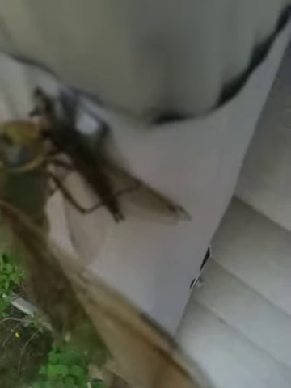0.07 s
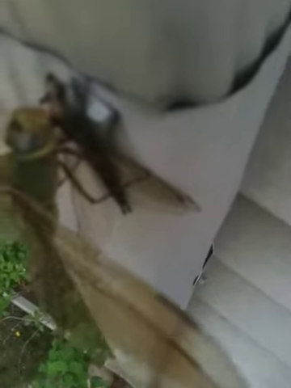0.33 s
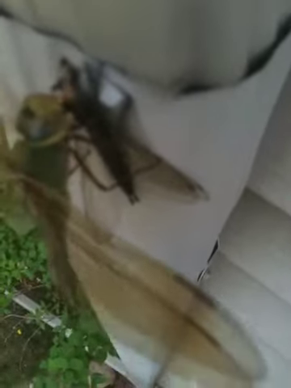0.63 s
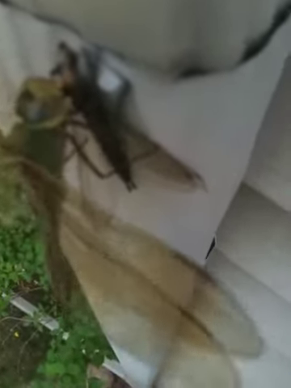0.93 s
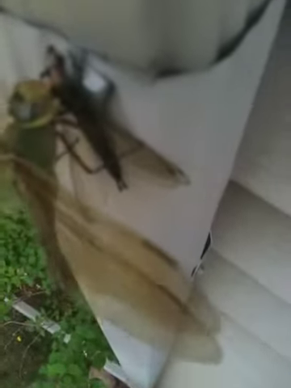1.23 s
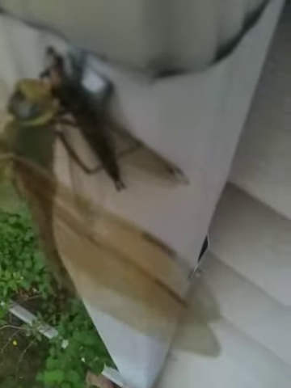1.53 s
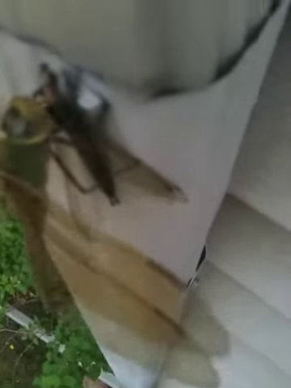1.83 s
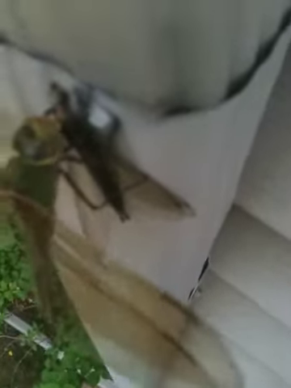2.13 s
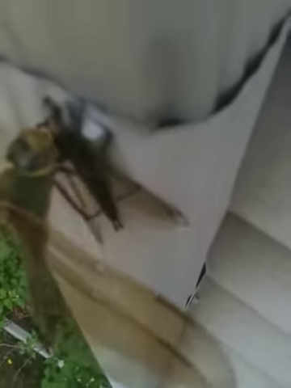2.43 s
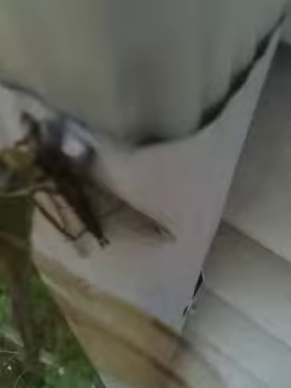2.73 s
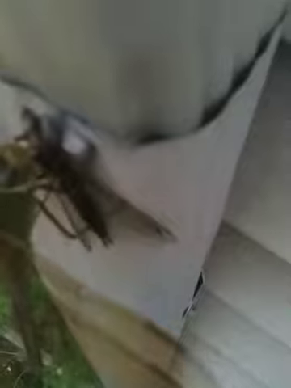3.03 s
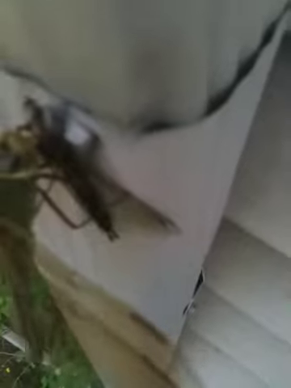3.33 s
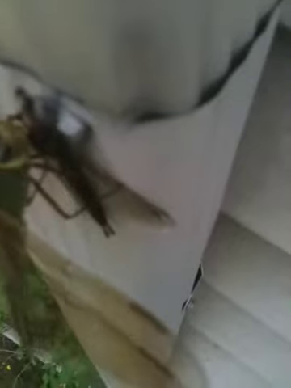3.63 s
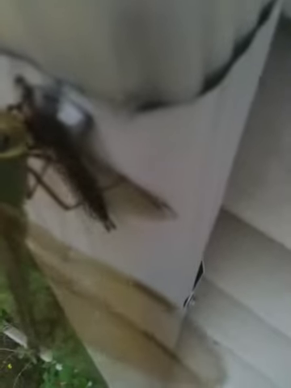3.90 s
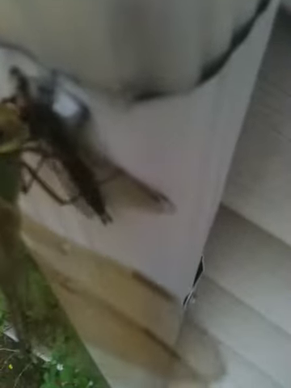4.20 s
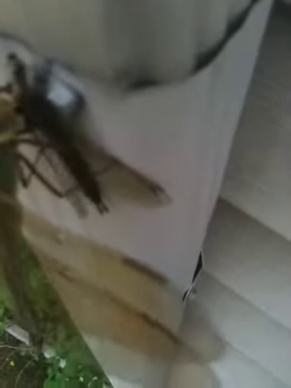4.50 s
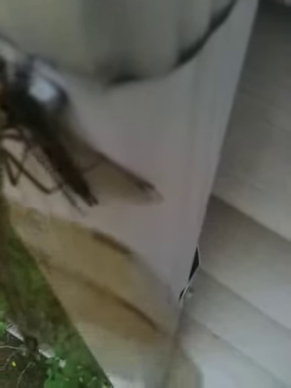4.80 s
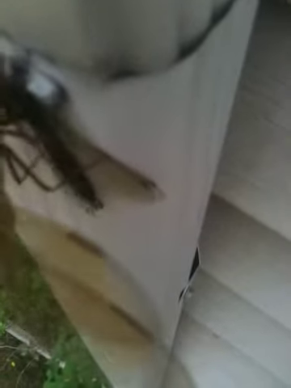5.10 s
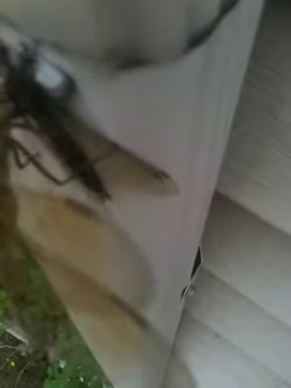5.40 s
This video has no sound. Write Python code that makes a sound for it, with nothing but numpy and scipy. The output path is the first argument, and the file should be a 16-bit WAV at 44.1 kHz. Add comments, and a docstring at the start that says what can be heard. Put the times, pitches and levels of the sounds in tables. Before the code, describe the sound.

Low knocks and rubbing from a hand on the microphone open the sound, with one faint, dry bird chirp. Very close, a dragonfly starts cracking a fly's shell in tiny, brittle snaps that grow more frequent, mixed with thin scrapes and crackle. The handling settles while the chewing goes on, and far across the still garden come faint echoing chirps and a thin whistle. A light hiss lies under everything.

```python
"""Sharp little ticks over low, uneven bumps: a dragonfly chews a fly in a quiet garden,
a few centimetres from the microphone of a hand-held camera. Its jaws snap the dry shell,
with fine crackle and short rasps in between. The hand knocks and rubs on the camera's case.
A nearer bird gives one clean, dry chirp early on; near the end come a whistle and rough,
echoing chirps from far off. Faint air and microphone hiss lie under it all."""
import sys
import numpy as np
from scipy import signal
from scipy.fft import rfft, irfft
from scipy.io import wavfile
from scipy.ndimage import uniform_filter1d

SR = 44100
rng = np.random.default_rng(int(sys.argv[2]) if len(sys.argv) > 2 else 0)


def digitize_waveform(pressure):
    """Quantize a signal to 16-bit integers and store it at the path in sys.argv[1].

    Rows of a 2-D input are taken as channels; values are limited to [-1, 1].
    """
    field = np.atleast_2d(pressure).T
    bounded = np.clip(field, -1, 1)
    quanta = np.round(bounded * 32767).astype(np.int16)
    wavfile.write(sys.argv[1], SR, quanta)


N = 244755
TIME = np.arange(N) / SR

# Loud snaps, centimetres from the microphone; body and top are relative to the shell's middle register.
# start_s, level_db, body_db, top_db
SNAPS = [(.871, -37.5, -7, 1), (.8908, -36, -9, -9), (1.114, -50, -6, 6), (1.6382, -29.5, -11, -3.5),
         (1.8944, -43, -22, 7), (1.9054, -38, -14, 2), (1.9238, -44.5, -15, 4), (2.0315, -48, -14, 14),
         (2.11, -46, -13, -3), (2.2322, -36, -16.5, 11), (2.4974, -47, -24, 10), (2.5835, -46, -16, 0),
         (2.7055, -45, -16, 3), (2.7558, -43, -12, -3), (2.776, -50, -17, 2), (2.7933, -47.5, -18, 1),
         (2.8165, -42.5, -24, 5), (2.881, -45, -26, 6), (2.9758, -38, -19.5, 2), (3.0333, -49, -13, 11),
         (3.2075, -43, -22, 10), (3.2505, -38, -15, 1), (3.2729, -28, -19.5, 15), (3.2933, -40, -24, 5),
         (3.305, -34, -30, 15), (3.4515, -37.5, -19, 10), (3.5, -34, -18, 8), (3.5165, -45, -16, 2),
         (3.5344, -50.5, -18, 6), (3.6446, -33, -14, 9.5), (3.6686, -50.5, -21, 9), (3.74, -47, -16, -7),
         (3.841, -49, -22, 8), (3.8559, -48, -20, 5), (3.938, -34.5, -21, 8.5), (3.98, -46, -17, 2),
         (3.9895, -49, -24, 5), (4.1335, -49, -22, 1), (4.3408, -54, -20, 2), (4.3525, -48.5, -20, -4),
         (4.5524, -49.5, -18, 1), (4.5601, -45.5, -25, 9), (4.568, -46, -18, 4), (4.5835, -49, -18, 4),
         (4.6175, -46, -9, 12), (4.6995, -50.5, -8, 7), (4.8385, -52, -18, 1), (4.8627, -50.5, -5, 5),
         (4.8815, -49, -20, 9), (4.9518, -31.5, -22, 10), (4.958, -41, -24, 10), (4.9705, -43, -16, 10),
         (4.9956, -43, -22, 8), (5.1502, -52.5, -18, 0), (5.2085, -47, -18, -1), (5.249, -48, -20, 4),
         (5.2608, -42, -28, -4), (5.2915, -48, -23, 6), (5.3035, -41, -13, 8), (5.3287, -41.5, -24, 7),
         (5.3425, -45.5, -20, 8), (5.4605, -50.5, -18, 1)]
def snaps(crack_s=0.00012, crack_gain=0.28, splinter_s=0.0016, splinter_db=-24, body_trim_db=-1):
    """Each snap is one break that runs on for a fraction of a millisecond, then a faint splintering."""
    out, t = np.zeros(N), np.arange(1024) / SR
    decay = crack_gain * np.exp(-t / crack_s) + from_db(splinter_db) * np.exp(-t / splinter_s)
    for start_s, level_db, body_db, top_db in [*SNAPS, *lesser_snaps()]:
        force = rng.standard_normal(len(t)) * decay
        force[0] += 1
        body, middle, top = shell(force, spread_db=2)
        # A smaller break is thinner: its body begins an octave higher for each 4.5 dB it loses.
        lowest_hz = np.clip(238 * 2 ** (-body_db / 4.5), 500, 6500)
        body = signal.sosfilt(signal.butter(3, lowest_hz, "high", fs=SR, output="sos"), body)
        body, middle, top = (unit_crest(part, samples=44) for part in (body, middle, top))
        bright = unit_crest(middle + from_db(top_db) * top, samples=30)
        tick = bright + from_db(body_db + body_trim_db) * body
        add(out, start_s, from_db(level_db) * tick)
    return out


# Resonances of the fly's dry shell, in three registers: centre_hz, width_hz, gain_db
SHELL_BODY = [(1920, 430, -2), (3450, 490, -0.5), (4320, 690, -2), (7080, 1000, 0.5)]
SHELL_MIDDLE = [(9100, 980, -1.9), (10300, 1600, -0.6)]
SHELL_TOP = [(12440, 750, 0.93), (14370, 2230, 1), (15040, 1550, 0.086)]
def shell(force, spread_db=0, split_hz=8300):
    """The shell rings under a force; returns its low body, middle and top registers."""
    low = signal.sosfilt(signal.butter(3, split_hz, "low", fs=SR, output="sos"), force)
    high = signal.sosfilt(signal.butter(3, split_hz, "high", fs=SR, output="sos"), force)
    return (resonate(low, SHELL_BODY, spread_db),
            resonate(high, SHELL_MIDDLE, spread_db),
            resonate(high, SHELL_TOP, spread_db))


# Vigour of the chewing, heard close up as the level of its crackle: time_s, level_db
CHEWING = [(0, -81.5), (1.35, -79), (1.75, -73.5), (2.6, -75), (2.93, -73.5), (3.4, -76), (3.9, -73),
           (4.07, -76), (4.3, -71.5), (4.5, -75.5), (4.85, -71.5), (5.06, -72.5), (5.3, -71.5),
           (5.55, -73.5)]
def crackle(breaks_per_s=750, clump_db=3.5, stroke_db=4.5, middle_db=-5, body_db=-12):
    """The shell crumbles finely, in clumps that swell and sink with the uneven strokes of the jaws."""
    force = fractures(breaks_per_s * from_db(clump_db * drift(per_s=40)), size_db=3)
    body, middle, top = map(unit_rms, shell(force))
    grains = top + from_db(middle_db) * middle + from_db(body_db) * body
    strokes = from_db(stroke_db * drift(per_s=22))
    return from_db(curve(CHEWING)) * unit_rms(grains * strokes)


def lesser_snaps(tries=160, full_vigour_odds=1.665, over_crackle_db=17.5):
    """Chance rows like those of SNAPS: harder chewing makes more of them, and louder."""
    moment, luck = rng.random((tries, 2)).T
    start_s = moment * N / SR
    vigour_db = np.interp(start_s, *np.transpose(CHEWING))
    happens = luck < full_vigour_odds * from_db(vigour_db - vigour_db.max())
    extra_db, body_db, top_db = rng.normal([over_crackle_db, -18, -5], [3.5, 4.5, 4.5], (tries, 3)).T
    return np.transpose([start_s, vigour_db + extra_db, body_db, top_db])[happens]


def fractures(per_s, size_db):
    """Tiny breaks at random moments: many weak, a few strong."""
    sizes = from_db(size_db * np.minimum(rng.exponential(1, N), 4))
    signs = rng.choice([-1, 1], N)
    return sizes * signs * (rng.random(N) < per_s / SR)


# Jaw scrapes, as close as the snaps: start_s, length_s, level_db, body_db, top_db
RASPS = [(0.0, 0.045, -65.5, -1, 0), (0.328, 0.058, -70, -4, 2), (1.738, 0.075, -68.5, -4, 4),
         (1.84, 0.11, -69, -2, 1), (2.096, 0.054, -59.5, -1.5, -1), (2.32, 0.12, -66.5, -14, 3),
         (2.56, 0.033, -66, -6, 3), (2.633, 0.033, -62.5, 0, 1), (2.74, 0.11, -58.5, -11.5, 4),
         (2.918, .035, -65, -12, 5), (3.232, 0.026, -64, -14, 2), (3.52, 0.044, -61.5, -14, 2),
         (3.66, 0.031, -65, -18, 0), (3.735, 0.019, -62, -7, -3), (3.828, 0.036, -66, -14, 1),
         (3.878, 0.034, -62.5, -16, 5), (3.97, 0.032, -64, -16, 0), (4.192, 0.085, -65, -18, 0),
         (4.417, 0.031, -63, -16, 7), (4.546, 0.11, -67, -5.5, 4), (4.939, 0.028, -52.5, -15, 1),
         (5.127, .04, -66, -9, 3), (5.29, 0.072, -64, -7, 6), (5.485, .08, -70, -12, 4)]
def rasps(breaks_per_s=1500, clump_db=3.5, trim_db=0.1):
    """A jaw slides over the shell, catching and slipping: a short run of breaks that swells and fades."""
    force = fractures(breaks_per_s * from_db(clump_db * drift(per_s=250)), size_db=2.5)
    body, middle, top = map(unit_rms, shell(force))
    out = np.zeros(N)
    for start_s, length_s, level_db, body_db, top_db in RASPS:
        during = (TIME > start_s) & (TIME < start_s + length_s)
        stroke = np.sin(np.pi * (TIME[during] - start_s) / length_s) ** 0.76
        grains = unit_rms(middle + from_db(top_db) * top) + from_db(body_db) * body
        rasp = unit_rms(stroke * grains[during]) * np.sqrt(np.mean(stroke ** 2))
        out[during] += from_db(level_db + trim_db) * rasp
    return out


# Colour of handling noise, carried through the case to the microphone: frequency_hz, gain_db
CAMERA_CASE = [(25, -43), (45, -30.5), (65, -19), (90, -6), (125, -1.5), (170, -0.5), (240, -8.5),
               (330, -17.5), (480, -30.5), (700, -42.5), (1200, -70), (2500, -106)]
# Bumps of the hand on the camera; the edge is relative to the thud: peak_s, level_db, edge_db
BUMPS = [(0.128, -38, -15.5), (.384, -38, -16), (.404, -31.5, -10.5), (.428, -37.5, -20), (.465, -40, -26),
         (.501, -39, -33), (.517, -42.5, -27), (0.718, -37.5, -31), (0.77, -36, -38), (0.819, -39, -26),
         (.852, -38, -21), (.963, -38, -31), (.984, -35.5, -33), (1.114, -40.5, -38), (1.21, -45.5, -36),
         (1.27, -38, -31), (1.42, -42.5, -28), (1.542, -35, -26), (1.679, -39.5, -18.5),
         (1.738, -40.5, -24), (1.944, -38.5, -23), (1.977, -40, -22), (2.015, -34.5, -22),
         (2.102, -31, -25.5), (2.113, -34.5, -25), (2.172, -36, -18), (2.202, -44, -8), (2.236, -33.5, -17),
         (2.279, -35.5, -7.5), (2.289, -28, -25), (2.342, -32.5, -20), (2.362, -24.5, -35),
         (2.401, -32.5, -16), (2.425, -34.5, -19), (2.505, -36.5, -11.5), (2.545, -37, -26),
         (2.572, -38.5, -27), (2.63, -32, -8.5), (2.709, -38, -23), (2.869, -35, -24), (2.906, -32, -30),
         (2.942, -30, -27), (2.968, -26.5, -20.5), (2.986, -34.5, -29), (3.037, -44, -15.5),
         (3.26, -33, -23), (3.352, -42.5, -25), (3.685, -43, -25), (3.71, -40.5, -24), (3.832, -38, -30),
         (3.887, -38, -20.5), (3.949, -37.5, -26), (4.014, -38, -21), (4.133, -40, -29), (4.166, -37, -20),
         (4.183, -37, -25), (4.24, -43, -18), (4.381, -48, -26)]
def bumps(push_s=0.0034, rub_s=0.017, rub_db=-11, edge_s=0.01, edge_trim_db=-2, soft_bump_db=-39.5):
    """Short pushes shake the camera with a cycle or two of dull thud; hard ones add a higher edge."""
    out, t = np.zeros(N), np.arange(-2048, 2048) / SR
    for peak_s, level_db, edge_db in BUMPS:
        push, scuff = rng.standard_normal((2, len(t)))
        push *= np.exp(-(t / push_s) ** 2) + from_db(rub_db) * np.exp(-np.abs(t) / rub_s)
        scuff *= np.exp(-(t / edge_s) ** 2)
        bass_db = soft_bump_db - level_db  # a firmer grip is stiffer and passes less bass
        thud = coloured(coloured(push, CAMERA_CASE), [(100, bass_db), (170, 0), (260, -1), (450, -7.5)])
        edge = coloured(coloured(scuff, CAMERA_CASE), [(200, -37), (360, 6.5), (700, 6)])
        thud, edge = unit_crest(thud, samples=180), unit_crest(edge, samples=441)
        bump = thud + from_db(edge_db + edge_trim_db) * edge
        add(out, peak_s + t[0], from_db(level_db) * bump)
    return out


# The grip on the camera shifts, then settles: time_s, level_db
GRIP = [(0, -54), (.3, -51.5), (.56, -43), (.67, -53), (.93, -49.5), (1.15, -60), (1.55, -55),
        (1.88, -52.5), (2.18, -41.5), (2.42, -42.5), (2.6, -49.5), (2.78, -55.5), (2.93, -47), (3.09, -52),
        (3.52, -63.5), (3.92, -54.5), (4.2, -65.5), (4.68, -79), (5.55, -105)]
def grip_rumble(lump_db=3, soft_rub_db=-49.5, grit_db=-19.5, grit_growth=0.53, trim_db=-1):
    """Fingers rub unevenly on the case; the firmer they press, the less deep bass and the more grit."""
    grip_db = curve(GRIP)
    lumps = from_db(lump_db * np.minimum(drift(per_s=70), 1))
    rubbing = unit_rms(coloured(rng.standard_normal(N) * lumps, CAMERA_CASE))
    bass = coloured(rubbing, [(116.25, 0), (232.5, -24)])
    bass_loss = 1 - from_db(-np.maximum(grip_db - soft_rub_db, 0))
    grit_colour = [(180, -29), (330, 3), (520, -6), (760, -17), (1200, -36), (2500, -72)]
    grit = unit_rms(coloured(rng.standard_normal(N) * lumps, grit_colour))
    grit_gain = from_db(grit_db + grit_growth * (grip_db - grip_db.max()))
    return from_db(grip_db + trim_db) * (rubbing - bass_loss * bass + grit_gain * grit)


# One bird's whistle across the garden; it holds, dips and rises: time_s, pitch_hz, level_db
WHISTLE = [(5.398, 2800, -70), (5.412, 3140, -55.5), (5.434, 3085, -54), (5.465, 2950, -66.5),
           (5.487, 2600, -62.5), (5.508, 2084, -69), (5.518, 2450, -66), (5.53, 3220, -65),
           (5.55, 3670, -68)]
# One clean, dry chirp from a nearer bird early on; rough, echoing chirps far off near the end.
# start_s, length_s, glide_s, from_hz, to_hz, level_db, roughness (0 is pure), echo_db (relative)
CHIRPS = [(0.636, 0.036, 0.017, 10030, 7850, -67.5, 0, -15), (4.912, 0.072, 0.034, 8100, 6780, -68, 1, 4),
          (4.958, 0.04, 0.022, 8730, 7480, -68.5, 1, 2), (5.034, 0.08, .04, 3750, 4020, -78.5, 1.05, 2),
          (5.077, 0.105, 0.035, 8600, 6800, -64.5, 0.7, 4), (5.112, 0.051, 0.0268, 3050, 3350, -73, 1, 1),
          (5.241, 0.115, 0.06, 8700, 6830, -65.5, 1.06, 4), (5.431, 0.115, 0.026, 8470, 7380, -67.5, 1, 2),
          (5.379, 0.024, 0.013, 2740, 3570, -65, .7, -3)]
def birds(whistle_echo_db=-5, chirp_ends_db=-9, echo_t60_s=0.5):
    """A thin whistle and chirps that swell, glide and fade; leaves scatter the far ones into a smear."""
    time_s, pitch_hz, level_db = np.transpose(WHISTLE)
    direct = bird_note(time_s[0], time_s[-1],
                       np.interp(TIME, time_s, pitch_hz), np.interp(TIME, time_s, level_db))
    scattered = from_db(whistle_echo_db) * direct
    for start_s, length_s, glide_s, from_hz, to_hz, level_db, roughness, echo_db in CHIRPS:
        age_s = np.clip(TIME - start_s, 0, length_s)
        pitch_hz = to_hz + (from_hz - to_hz) * np.exp(-(age_s / glide_s) ** 2)
        swell_db = chirp_ends_db * (2 * age_s / length_s - 1) ** 2
        note = bird_note(start_s, start_s + length_s, pitch_hz, level_db + swell_db,
                         waver=0.025 * roughness, flutter_db=6 * roughness)
        direct += note
        scattered += from_db(echo_db) * note
    t = TIME[:SR // 2]
    echoes = rng.standard_normal(len(t)) * from_db(-60 * t / echo_t60_s)
    return direct + signal.fftconvolve(scattered, echoes / np.linalg.norm(echoes))[:N]


def bird_note(start_s, end_s, pitch_hz, level_db, waver=0.0068, flutter_db=0.5, fade_s=0.004):
    """One nearly pure note that wavers around a given pitch and level."""
    fade = np.clip(np.minimum(TIME - start_s, end_s - TIME) / fade_s, 0, 1)
    wavering_hz = pitch_hz * (1 + waver * drift(per_s=500))
    gain = from_db(level_db + flutter_db * drift(per_s=150))
    return fade * gain * np.sin(2 * np.pi * np.cumsum(wavering_hz) / SR)


# Colour of the still garden air all round the microphone: frequency_hz, gain_db
GARDEN_AIR = [(25, -20), (60, -17), (100, -13.5), (150, 1), (200, -2), (280, -3.5), (400, -7), (600, -13.5),
              (950, -10), (1400, -14.5), (2000, -16), (2800, -20), (4200, -17), (5500, -18), (8000, -21),
              (11000, -43)]
def air_and_hiss(air_db=-66, hiss_db=-74.5):
    """Faint steady outdoor air and the microphone's own hiss."""
    air = unit_rms(coloured(rng.standard_normal(N), GARDEN_AIR))
    hiss_colour = [(4000, -20.5), (7000, -2), (9000, 1), (12000, -2.5), (15300, -1.5), (16200, -14)]
    hiss = unit_rms(coloured(rng.standard_normal(N), hiss_colour))
    return from_db(air_db) * air + from_db(hiss_db) * hiss


def resonate(force, modes, spread_db):
    """Broad resonances in parallel, alternating in sign, their strengths scattered by spread_db."""
    out = 0
    for k, (centre_hz, width_hz, gain_db) in enumerate(modes):
        edges_hz = [centre_hz - width_hz / 2, centre_hz + width_hz / 2]
        band = signal.butter(1, edges_hz, "band", fs=SR, output="sos")
        gain = (-1) ** k * from_db(gain_db + spread_db * rng.normal())
        out = out + gain * signal.sosfilt(band, force + 1e-18)
    return out


def coloured(sound, colour):
    """Filter a sound by a smooth curve through (frequency_hz, gain_db) points."""
    frequency_hz, gain_db = np.transpose(colour)
    bins_hz = np.maximum(np.fft.rfftfreq(len(sound), 1 / SR), 1)
    gains = from_db(np.interp(np.log(bins_hz), np.log(frequency_hz), gain_db))
    return irfft(rfft(sound) * gains, len(sound))


def drift(per_s):
    """A random wander that heads for a new value per_s times a second."""
    return np.interp(TIME * per_s, np.arange(4096), rng.standard_normal(4096))


def curve(rows):
    """Join (time_s, value) rows by straight lines."""
    return np.interp(TIME, *np.transpose(rows))


def from_db(db):
    """Decibels to gain."""
    return 10 ** (np.asarray(db) / 20)


def unit_rms(sound):
    """Scale to rms 1."""
    return sound / np.sqrt(np.mean(sound ** 2) + 1e-20)


def unit_crest(sound, samples):
    """Scale so that the loudest stretch of that many samples has an envelope of 1."""
    power = np.abs(signal.hilbert(sound)) ** 2
    return sound / np.sqrt(uniform_filter1d(power, samples).max())


def add(out, start_s, sound):
    """Mix a short sound in at start_s."""
    at = max(round(start_s * SR), 0)
    out[at:at + len(sound)] += sound[:max(N - at, 0)]


def scene():
    """In mono: the dragonfly up close, the hand on the camera and the garden behind."""
    dragonfly = snaps() + crackle() + rasps()
    handling = bumps() + grip_rumble()
    return (dragonfly + handling + birds() + air_and_hiss())[None]


def record(dry, cutoff_hz=16200):
    """The camera cuts off the highest treble steeply."""
    return signal.sosfilt(signal.ellip(10, .2, 70, cutoff_hz, fs=SR, output="sos"), dry)


dry = scene()
out = record(dry)
digitize_waveform(out)
```